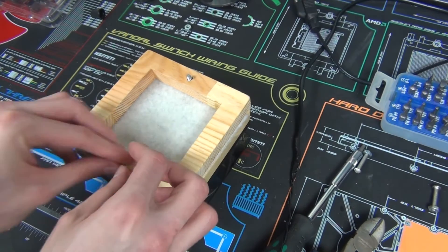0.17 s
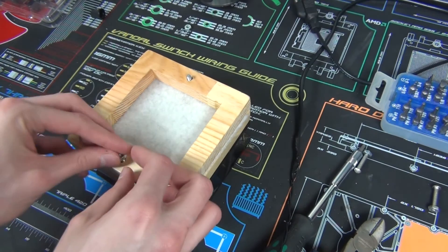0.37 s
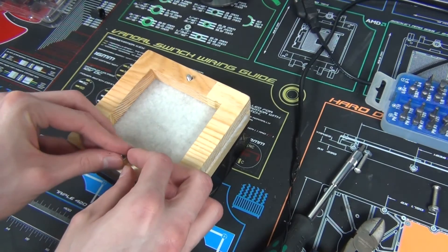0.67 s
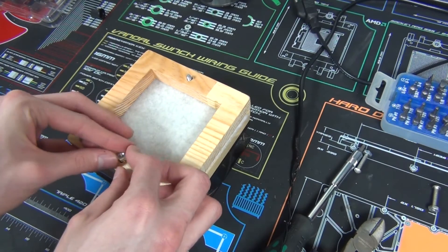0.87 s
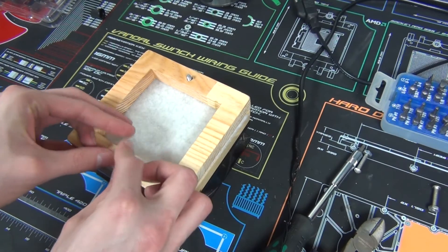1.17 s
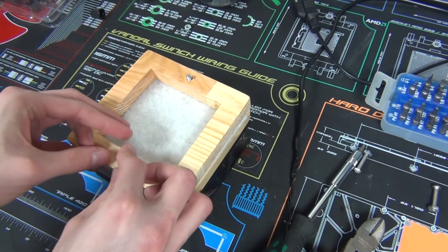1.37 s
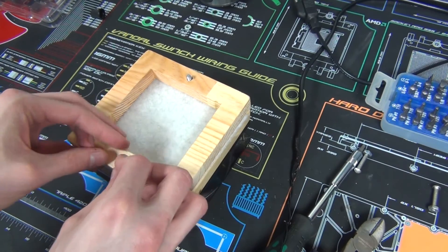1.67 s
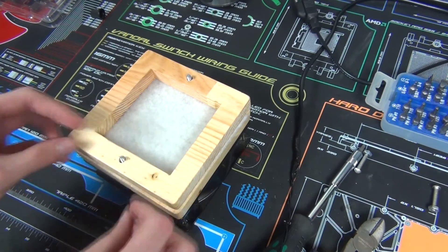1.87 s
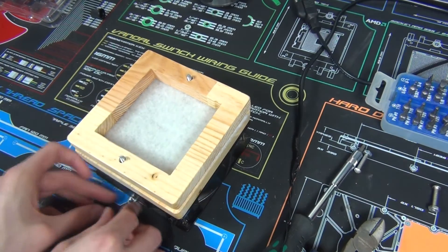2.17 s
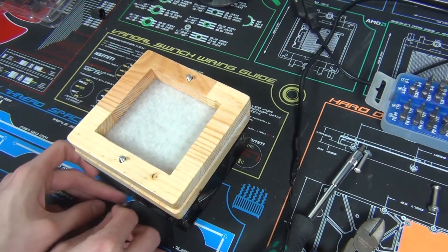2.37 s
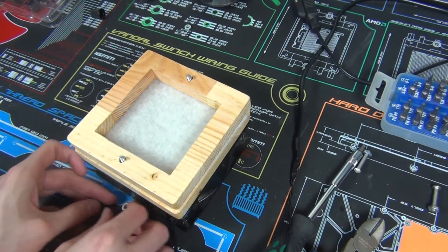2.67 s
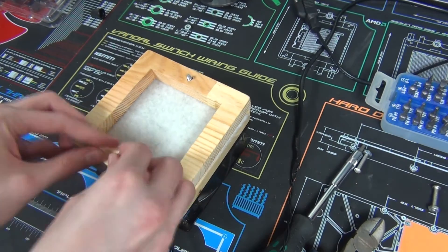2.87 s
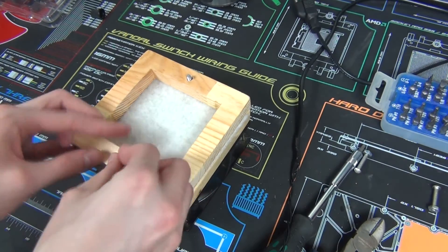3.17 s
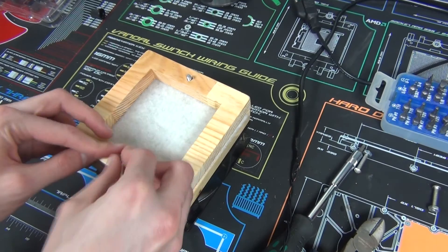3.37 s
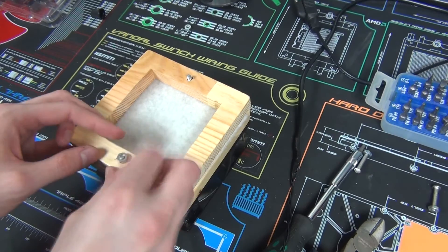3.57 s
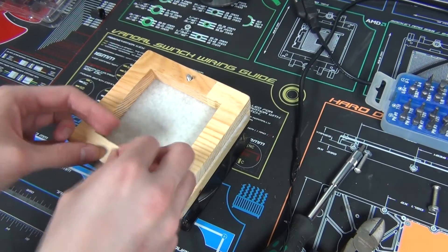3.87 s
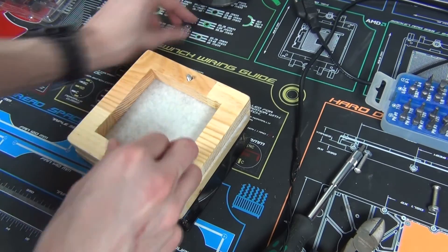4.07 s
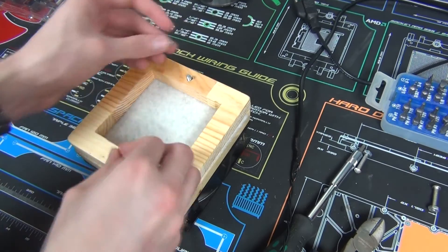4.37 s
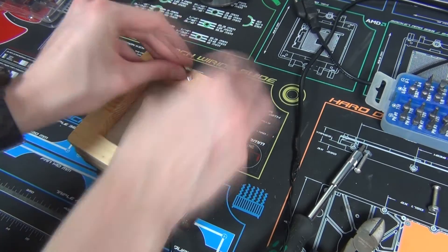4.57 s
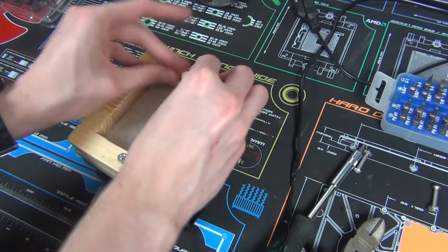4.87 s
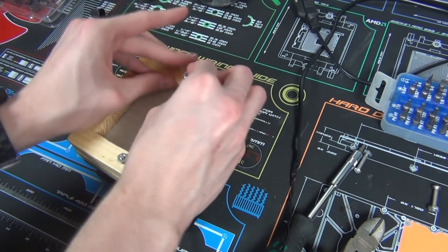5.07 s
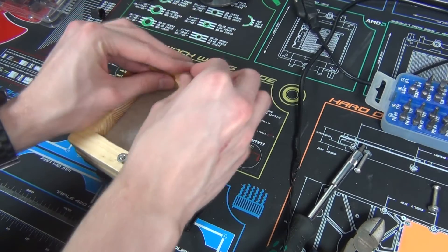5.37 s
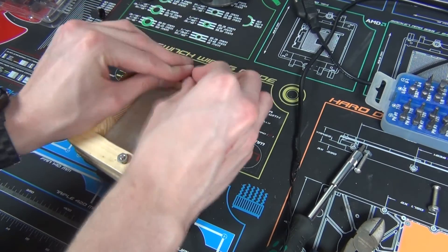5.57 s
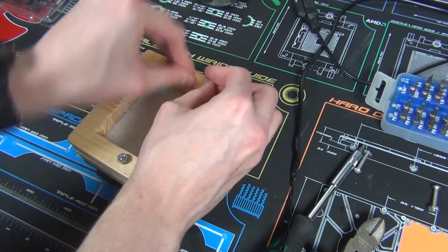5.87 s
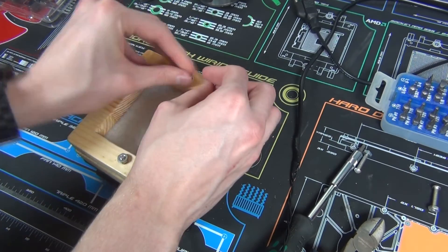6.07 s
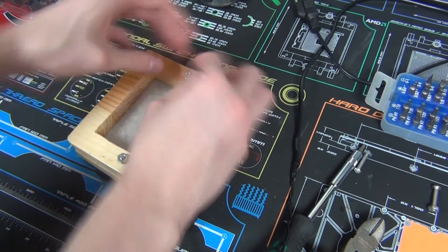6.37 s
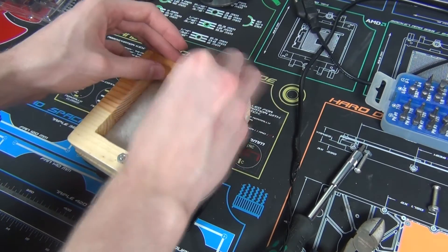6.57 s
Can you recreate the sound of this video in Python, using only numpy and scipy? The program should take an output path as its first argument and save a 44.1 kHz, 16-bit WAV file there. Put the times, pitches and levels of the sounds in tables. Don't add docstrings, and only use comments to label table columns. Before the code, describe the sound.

Close workbench fiddling: sharp metallic clicks, wooden knocks and a brief steel ring give way to faint ticks, scrapes and snaps above steady fan air.

```python
import sys
import numpy as np
from scipy import signal
from scipy.fft import rfft, irfft, next_fast_len
from scipy.io import wavfile
from scipy.ndimage import uniform_filter1d, map_coordinates

SR = 44100
rng = np.random.default_rng(int(sys.argv[2]) if len(sys.argv) > 2 else 0)


def wav_record(signal):
    frames = np.transpose(np.atleast_2d(signal))
    bounded = np.clip(frames, -1, 1)
    quanta = np.round(bounded * 32767).astype(np.int16)
    wavfile.write(sys.argv[1], SR, quanta)


def level_to_linear(level):
    exponent = np.asarray(level, float) / 20
    return 10 ** exponent


N = 297234
QUIET_FROM_S = 2.735

# f/Hz, width/Hz, level/dB
BOLT = [(1873, 78, 0), (2090, 200, 5), (2300, 360, 4), (2520, 630, -1.5)]


def unit(x):
    return x / np.sqrt(np.mean(x ** 2) + 1e-20)


def along(points, hz):
    f, v = np.transpose(points)
    return np.interp(np.log(hz + 1), np.log(f + 1), v)


def curve(rows):
    return np.interp(np.arange(N) / SR, *np.transpose(rows))


def wobble(rate):
    knots = rng.standard_normal(int(N * rate / SR) + 4)
    return map_coordinates(knots, [np.arange(N) * rate / SR])


def filtered(x, response):
    m = next_fast_len(N + SR // 2)
    return irfft(rfft(x, m) * response(np.fft.rfftfreq(m, 1 / SR)), m)[..., :N]


def body(peaks, widen=1.):
    def response(f):
        h = 0
        for k, (center, width, db) in enumerate(peaks):
            damping = 1j * f * width * widen
            h = h + (-1) ** k * level_to_linear(db) * damping / (center * center - f * f + damping)
        return h / np.sqrt(np.mean(np.abs(h) ** 2))
    return response


def ring(hz, t60, attack, flutter=0.):
    t = np.arange(SR // 2) / SR
    drift = flutter * np.cumsum(rng.standard_normal(len(t))) / np.sqrt(SR)
    return level_to_linear(-60 * t / t60) * (1 - np.exp(-t / attack)) * np.sin(2 * np.pi * hz * t + drift)


def strokes():
    # t/s, peak/dB, wood share/dB, nut share/dB, t60/s
    blows = [(0.2097, -11.5, -19.5, 0.5, 0.015), (0.23, -28.5, -4.5, -31.5, 0.04),
             (.387, -19.5, -10.5, -0.5, 0.034), (0.4989, -27.5, -11.5, -9, 0.044),
             (0.529, -17, -16, 2, 0.01), (0.6585, -19.5, -11, -5, 0.015), (0.7703, -23, -8.5, -8.5, 0.019),
             (1.4428, -14.5, -14.5, 1, 0.017), (1.494, -32.5, 1.5, -36.5, 0.038),
             (1.639, -21.5, 4, -33, 0.017), (1.6701, -11.5, -34, 4.5, 0.022),
             (1.8239, -26.5, -12, -0.5, 0.012), (2.1523, -36.5, -4.5, -2.5, 0.033),
             (2.3657, -33, -18, -9.5, 0.085), (2.5035, -45, 15, -31.5, 0.011),
             (2.8796, -29.5, -19.5, -0.5, 0.023), (3.086, -31, -11.5, -2.5, 0.028),
             (3.584, -35, -13, -5, 0.1), (4.7255, -33, -13.5, -6.5, 0.072), (5.4068, -39, -6, -5, 0.039),
             (5.415, -29.5, -21, -7, 0.029), (5.4868, -32, -16, -13.5, 0.0093),
             (5.986, -31, -6.5, 0, 0.034), (6.5605, -29.5, -17.5, -12.5, 0.012)]
    # t/s, peak/dB, wood share/dB, nut share/dB, rise/ms
    shoves = [(.0589, -32, -5.5, -11, 1.8), (.3479, -22.5, -5, -1, 3.1), (.3733, -13, -22, 1.5, 2.9),
              (.7491, -39.5, -2.5, -17, 10), (.8247, -42.5, 8, -28, 3.7), (.9779, -31.5, -6.5, -11, 2.7),
              (1.1708, -31, -22, -10.5, 3.3), (1.2178, -14.5, -11, 4.5, 2.5),
              (1.4735, -22, -10.5, 4.5, 7.3), (2.1417, -39.5, 3.5, -8, 2.2), (2.1601, -28.5, -6, -3.5, 2.1),
              (2.719, -41, -13, 6.5, 1.9), (2.888, -33.5, -13.5, -8, 4.1), (3.0967, -32.5, -11, -2, 5.6),
              (3.4045, -37, -11, -4.5, 2.1), (3.5988, -23, -13.5, -1, 13), (3.612, -25.5, -23, -1.5, 9.7),
              (4.7332, -31, -16, -3, 9.6), (4.875, -35, -14, -12, 5.3), (5.9989, -31, -11.5, 3.5, 4.1),
              (6.261, -41.5, -5, 6, 1.9), (6.2773, -44.5, -3, -13.5, 13.7), (6.705, -40, -3.5, -8.5, 47)]
    # t/s, peak/dB, wood share/dB, nut share/dB, t60/s
    rattles = [(0.238, -40, -3, 5, 0.021), (1.674, -26, -19, 2.5, 0.37), (1.712, -29.5, 3.5, -27.5, 0.038),
               (1.8906, -41, 1.5, -11, 0.13), (1.9447, -37, -2, 2, 0.1), (2.145, -42, 0, -2, 0.17),
               (2.2323, -56, -6, 6, .059), (2.4022, -60, 5, -7.5, 0.069), (3.0045, -45.5, -10, -36, 0.1),
               (4.181, -41, -5, -28, 0.038), (4.479, -43, -2.5, -19.5, 0.072),
               (5.8529, -44.5, -2, -24, 0.052), (5.8756, -44, -6, -7.5, 0.033),
               (6.6582, -45.5, -5, -21, 0.065)]
    # t/s, peak/dB, nut share/dB
    ticks = [(0.997, -44, -36), (2.023, -52, 9), (2.953, -44, -11.5), (3.172, -45, -8.5), (3.1885, -59, -1),
             (3.201, -46, -27.5), (3.3582, -51.5, -2), (3.544, -51, -19), (4.0024, -52.5, -16),
             (4.196, -44, -13), (4.6435, -53, -5.5), (4.9105, -52, -5), (5.1065, -46.5, -9.5),
             (5.1157, -40.5, -9), (5.1788, -39.5, -19), (5.195, -45.5, -17), (5.224, -37.5, -5.5),
             (5.3197, -45, -40), (5.3416, -41.5, -18), (5.356, -45, -13), (5.394, -53, -6),
             (5.4684, -42, -16), (5.994, -41, 8), (6.1218, -57.5, 3), (6.1954, -43, -6.5),
             (6.245, -43.5, -1), (6.5464, -40.5, -21), (6.6297, -49.5, -19.5), (6.6764, -45.5, -2.5)]
    # t/s, peak/dB, nut share/dB, rise/ms
    rolls = [(2.042, -58, 12, 2), (2.2965, -51, -3, 10), (2.32, -47.5, -3, 11), (3.285, -48, -33, 7.8),
             (3.4536, -49, -39, 3.6), (3.6762, -42, -5.5, 13), (3.856, -55, -7, 9.7),
             (3.9776, -56, -7, 9.1), (4.155, -46.5, -11, 17), (4.2177, -50, -21, 4.5),
             (4.655, -43, -6.5, 9.4), (4.7787, -45, -18, 4.1), (4.785, -44.5, -8, 9.6),
             (4.8236, -53, -15, 5.2), (4.9298, -54, 0, 8.6), (5.1307, -43.5, -9, 9.1),
             (5.2366, -46.5, -1.5, 4.9), (5.373, -48, -14, 5.8), (5.448, -51, -3, 4.2),
             (6.2727, -53.5, -12, 3.8), (6.3568, -46.5, -28, 28), (6.387, -51.5, -16.5, 6.2),
             (6.4337, -49.5, -24, 6.8)]
    # t/s, peak/dB, nut share/dB, rise/ms
    scrapes = [
        (1.211, -46, -14, 6),
        (2.866, -47, -8, 12),
        (4.709, -47, -8, 4),
        (4.886, -44, -10, 6),
    ]
    tick_wood_db, roll_wood_db = -11.5, -8
    return ([(s, db, wood, nut, 1.3, t60) for s, db, wood, nut, t60 in blows]
            + [(*row, 0.028) for row in shoves]
            + [(s, db, wood, nut, 4 + 1000 * .025 * t60, t60) for s, db, wood, nut, t60 in rattles]
            + [(s, db, tick_wood_db, nut, 3.1, 0.048) for s, db, nut in ticks]
            + [(s, db, roll_wood_db, nut, rise_ms, 0.033) for s, db, nut, rise_ms in rolls + scrapes])


def clump(rise_ms, t60):
    t = np.arange(SR // 4 if t60 > .12 else SR // 10) / SR
    rise = rise_ms / 1000 + 1e-4
    after = np.maximum(t - rise, 0)
    fall_db = -60 * after ** 2 / (after + 0.26 * rise) / (t60 + 0.0097)
    swell = level_to_linear(fall_db * [[.8], [.7], [.7], [1.1], [1.2]])
    swell = swell * np.minimum(t / rise, 1) ** 1.3
    snap = 1.1 / (1 + rise / 0.0035) * np.exp(-np.abs(t - rise) / 0.0004)
    grit = rng.standard_normal((3, len(t)))
    clumps = unit(uniform_filter1d(grit[2], size=24))
    grit = unit(grit[0] * level_to_linear(2.1 * grit[1] + 3.0 * clumps))
    return swell * grit + snap * np.sign(grit)


def contacts():
    # f/Hz, width/Hz, level/dB
    wood = [(300, 50, -13.5), (622, 72, -2.5), (878, 120, 6), (1012, 95, 11), (1217, 279, 8.5),
            (1500, 490, 4)]
    # f/Hz, width/Hz, level/dB
    held_bolt = [(1543, 210, -2.5), (1830, 190, 1), (2200, 275, 6.5), (2410, 690, 1.5)]
    # f/Hz, width/Hz, level/dB
    thread = [(3040, 500, -2), (3452, 460, 3), (4530, 640, 2), (5250, 1200, 2.5), (5950, 860, 0.5)]
    # f/Hz, width/Hz, level/dB
    steel_nut = [(6550, 18, -5), (7410, 67, 0), (8720, 140, -2.5), (9560, 87, -1.5), (10550, 190, -8),
                 (13130, 1000, -14.5)]
    # t/s, peak/dB, bolt share/dB, nut share/dB
    snaps = [(.212, -17, -0.5, -7), (.241, -26, -1, 1.5), (.3885, -16, 1, 4), (1.2203, -20, -4, 12),
             (1.6405, -24, -1, -10), (1.672, -26, -8, -9), (2.024, -39.5, -15, 6), (2.043, -45, -15, 4),
             (2.145, -40, -2, 0), (2.152, -36, -6, 1), (2.306, -50, -8, -5), (2.335, -46, -3, -3),
             (2.376, -35, -10, -5), (2.385, -48, -12, -8), (2.468, -55, -20, 2.5), (3.020, -50, -4, -10),
             (3.300, -56, -3, -8), (3.360, -51, -5, -1), (4.651, -44, -6, -2), (4.667, -44, -6, 3),
             (4.712, -50, -4, -8), (4.727, -37, -5, 0), (4.756, -43, -10, -2), (4.782, -46, -4, -5),
             (4.795, -46, -8, -1), (4.829, -47, -10, -10), (4.868, -43, -8, -9), (4.885, -34, -8, -6),
             (4.896, -36, -8, -9), (4.914, -49, -2, -10), (4.994, -53, -6, -3), (5.119, -37, -11, -3),
             (5.139, -40, -5, -7), (5.195, -45, -3, -3), (5.245, -35, -9, -6), (5.343, -43, -10, -7.5),
             (5.358, -42, -10, -7), (5.395, -45, -8, -5), (5.4175, -31, -6, -3), (5.425, -39, -8, 2),
             (5.453, -46, -8, -5), (5.472, -42, -4, -8.5), (5.9955, -34, -4, -5), (6.004, -36, -9, -0.5)]
    held_from_s = 2.25
    held_bolt_db, held_thread_db = -1.5, 1.5
    skip_samples, skip_sizes = np.array([-31, -9, 0, 23, 58]), [.3, -.5, 1, -.6, .4]
    snap_db = 8.5

    force = np.zeros((5, N + SR))
    for s, db, wood_db, nut_db, rise_ms, t60 in strokes():
        held = s > held_from_s
        thread_db = 0.4 * nut_db - 6.0 + held_thread_db * held
        shares = level_to_linear([wood_db - 0.5, -8, held_bolt_db - 8, thread_db, nut_db - 5.5])
        shares = shares * [True, not held, held, True, True]
        impacts = clump(rise_ms, t60)
        force[:, round(s * SR):][:, :impacts.shape[1]] += level_to_linear(db) * shares[:, None] * impacts
    for s, db, bolt_db, nut_db in snaps:
        held = s > held_from_s
        shares = level_to_linear([bolt_db - 8.5, bolt_db, bolt_db, -3, nut_db]) * [True, not held, held, True, True]
        force[:, round(s * SR) + skip_samples] += level_to_linear(db + snap_db) * np.outer(shares, skip_sizes)

    def reach(hz, low_hz, high_hz):
        above = (1j * hz / (low_hz + 1j * hz)) ** 2
        below = 1 / (1 - (hz / high_hz) ** 2 + 1.4j * hz / high_hz)
        return above * below

    # modes, widening, lowest and highest f/Hz
    parts = [(wood, 2.1, 200, 2400), (BOLT, .8, 700, 3500), (held_bolt, .9, 700, 3500),
             (thread, 1.3, 1500, 7000), (steel_nut, 7.5, 3000, 19000)]
    out = np.zeros(N)
    for push, (modes, widen, low_hz, high_hz) in zip(force[:, :N], parts):
        out += filtered(push, lambda hz: body(modes, widen)(hz) * reach(hz, low_hz, high_hz))
    return out


def steel():
    # t/s, peak/dB
    clinks = [
        (1.8925, -27),
        (1.945, -32.5),
    ]
    # f/Hz, t60/s, first level/dB, second level/dB
    loose = [(2225, 0.122, -2, -5), (2530, 0.14, -6.5, -11.5), (3400, .8, -27, -17.5),
             (3873, 0.22, -11, -16), (4420, 0.094, -13.5, -0.5), (4775, .08, -6, -17),
             (6410, .06, -13, -15), (7210, 0.16, -13, -17.5), (7763, .04, -10.5, -14),
             (8800, .07, -11.5, -6), (9281, 0.216, -27, -25), (9868, .1, -26, -17.5),
             (11740, .12, -21.5, -11.5), (12650, .05, -15, -22)]
    # f/Hz, level/dB, t60/s
    dropped = [(2092, -3, .3), (2165, -0.5, .3), (2890, -10, .3), (3530, -5.5, .3), (3840, -12, 0.15),
               (6000, -12, .25), (6800, -6, .22), (6900, 0, 0.25), (8470, -6.5, .2), (8300, -4.5, .25),
               (9281, -4.5, .22), (9921, -6.5, .22), (12320, -10, 0.17), (12980, -11.5, .18)]
    # t/s, level/dB
    drop = (1.671, -29.5)
    # f/Hz, level/dB, t60/s
    washer = [(5790, 1, 0.1135), (6000, -1.5, 0.12), (7461, -15.5, 0.12), (7540, -5, .15),
              (9500, -20, 0.29)]
    # t/s, level/dB
    washer_hit = (1.48, -34)
    # f/Hz, level/dB, t60/s
    frame = [(566, -11, .03), (823, -7, 0.055), (1043, -3.5, .04), (1206, -7, 0.048), (1464, -4, 0.041),
             (1850, 1, 0.043), (2070, -1, 0.016), (2462, -4, 0.026), (2865, -6, 0.0177), (3500, -7, .015)]
    # t/s, level/dB
    knocks = [
        (1.640, -11),
        (5.325, -45),
        (6.5632, -40),
    ]
    # t/s, level/dB, f/Hz, t60/s
    pings = [(.060, -35, 4570, 0.022), (.376, -12, 5200, 0.021), (1.733, -39, 2060, 0.036),
             (1.760, -44, 2240, 0.11), (2.164, -42, 9500, .05), (2.368, -51, 4000, .03),
             (2.384, -48, 4800, .03), (4.183, -48, 2300, .04), (4.727, -44, 4440, .025),
             (4.743, -37, 4550, .03), (4.781, -50, 4500, .02), (4.829, -49, 4500, .02),
             (4.867, -50, 4400, .02), (4.879, -40, 4460, 0.034), (4.895, -44, 4500, .02),
             (4.913, -51, 3500, .06), (4.913, -50, 1500, .03), (4.931, -53, 3320, .03),
             (5.243, -41, 4500, .02), (5.320, -44, 1780, .03), (5.419, -41, 2200, .04),
             (5.990, -39, 1850, 0.078), (6.250, -44, 1850, 0.059), (6.290, -48.5, 2200, .04),
             (6.562, -43, 1850, .035)]

    hits = []  # t/s, level/dB, modes, how much the pitch shakes
    for k, (s, db) in enumerate(clinks):
        hits.append((s, db, [(hz, levels[k], t60) for hz, t60, *levels in loose], 1.5))
    hits += [(*drop, dropped, 4.), (*washer_hit, washer, 1.2)]
    hits += [(s, db, frame, 1.2) for s, db in knocks]
    out = np.zeros(N + SR)
    for s, db, modes, shake in hits:
        for hz, level, t60 in modes:
            tone = ring(hz, t60, 0.00025, flutter=shake / np.sqrt(t60) * 3)
            out[round(s * SR):][:SR // 2] += level_to_linear(db + level + rng.normal(0, 1.9)) * tone
    for s, db, hz, t60 in pings:
        out[round(s * SR):][:SR // 2] += level_to_linear(db) * ring(hz, t60, 0.0006, flutter=18.0)
    return filtered(out[:N], lambda hz: (1j * hz / (150 + 1j * hz)) ** 2)


def thuds():
    # t/s, peak/dB, f/Hz
    pushes = [(0.057, -45.5, 101), (0.06, -38, 282), (0.063, -37, 460), (0.209, -44.5, 79),
              (0.371, -44, 95.4), (0.736, -49, 111), (0.83, -61.5, 91), (1.211, -61, 120), (1.481, -59, 59),
              (1.638, -26.5, 300), (1.64, -50, 120), (1.716, -36.5, 300), (1.804, -51.5, 81.6),
              (2.144, -43.5, 79.5), (2.15, -37.5, 183), (2.159, -38.5, 360), (2.869, -61, 60),
              (3.077, -53.5, 110.5), (3.672, -52, 65.3), (3.852, -62, 60.5), (3.999, -62, 55.3),
              (4.175, -58, 70.3), (4.476, -56, 74.3), (4.718, -59, 88.6), (.39, -56, 70), (2.136, -45, 200),
              (2.168, -42, 130), (2.185, -50, 240), (4.49, -58, 130), (3.4, -69, 60), (4.38, -62, 55.3),
              (5.3, -64.5, 55.3), (6.19, -62, 70), (6.55, -64, 60.2), (6.71, -63, 59.5)]
    out = np.zeros(N + SR)
    for s, db, hz in pushes:
        out[round(s * SR):][:SR // 2] += level_to_linear(db + 15.5) * ring(hz, 7.2 / hz, 1.4 / hz, flutter=3.0)
    return out[:N]


def rub():
    # t/s, length/s, level/dB
    drags = [
        (1.05, 0.67, -65),
        (1.7, 0.96, -65),
        (3.04, 0.23, -70.5),
        (3.53, 0.016, -62.5),
        (3.956, 0.047, -72.5),
        (4.642, 0.302, -62.5),
        (5.257, 0.25, -76.5),
        (5.99, 0.69, -83),
    ]
    # f/Hz, level/dB per Hz
    skin = [(410, -30), (700, -8.5), (886, -12), (1480, -6.5), (2160, -15.5), (2990, -14), (6740, -24),
            (16000, -42)]
    rest_db, ease_s = -80, 0.02
    t = np.arange(N) / SR
    pressure = level_to_linear(rest_db)
    for s, length, db in drags:
        inside = np.minimum(t - s, s + length - t)
        pressure = pressure + level_to_linear(db) * np.clip(inside / ease_s + 1, 0, 1)
    grains = rng.standard_normal(N) * level_to_linear(np.minimum(4.7 * wobble(60) + 3.4 * wobble(300), 9))
    drag = filtered(grains, lambda hz: level_to_linear(along(skin, hz)) * (1 + .3 * body(BOLT)(hz)))
    return pressure * level_to_linear(3.5) * unit(drag)


def diffuse(x):
    z = signal.stft(x, nperseg=256)[2]
    even = np.sqrt(np.abs(uniform_filter1d(np.abs(z) ** 2, size=7, axis=0)))
    return signal.istft(even * np.exp(1j * np.angle(z)), nperseg=256)[1][:N]


def room(x, size, count):
    # f/Hz, t60/s
    decay = [(300, 0.77), (2000, 0.42), (7000, 0.3), (14000, 0.14)]
    out = np.zeros((2, N + SR))
    step = -(-N // count)
    moments = np.pad(x, (0, count))[:step * count].reshape(count, -1)
    for start, part in zip(range(0, N, step), moments):
        hz, t, z = signal.stft(rng.standard_normal((2, SR // 2)), SR, nperseg=256)
        fall = level_to_linear(-60 * t / (size * along(decay, hz)[:, None]))
        mid, side = signal.istft(z * fall, SR, nperseg=256)[1]
        tail = np.array([mid + .5 * side, mid - .5 * side]) / np.linalg.norm(mid)
        delayed = np.pad(part, (260, 0))[None]
        answer = signal.fftconvolve(delayed, tail, axes=1)
        out[:, start:start + answer.shape[1]] += answer
    return out[:, :N]


def rush(gain, alike):
    turn = lambda hz: np.arccos(np.clip(along(alike, hz), -1, 1)) / 2
    noise = rng.standard_normal((2, N))
    mid, side = filtered(noise, lambda hz: gain(hz) * [np.cos(turn(hz)), np.sin(turn(hz))])
    return unit(np.array([mid + side, mid - side]))


def fan():
    # f/Hz, level/dB per Hz
    breeze = [(15, -50), (25, -14), (105, -5.5), (288, -2.5), (433, -2.5), (634, -5.5), (952, -5.5),
              (1360, -4.5), (1470, -7.5), (8600, -23.5), (11600, -23), (15200, -27), (16500, -56)]
    # f/Hz, width/Hz, level/dB
    hums = [(120, 27, 10), (177, 12, 9), (279.4, 13, 5.5), (634.2, 35, 13), (870, 43, 5), (1327, 12, 11.5)]
    # f/Hz, likeness/1
    likeness = [(60, 1), (130, 0.97), (300, 0.88), (900, 0.64), (3500, 0.25), (15000, 0.5)]
    # f/Hz, left minus right/dB
    lean = [(300, 0), (800, 7), (1500, 4), (4000, 0.5)]
    # t/s, level/dB
    whine = [
        (5.25, -100),
        (5.4, -77),
        (5.7, -77),
        (6.0, -79.5),
        (6.1, -87.5),
        (6.45, -82),
        (6.5, -100),
    ]
    duct = lambda hz: 1 + sum(level_to_linear(db) / (1 + (2 * (hz - c) / w) ** 2) for c, w, db in hums)
    level_db = -53 - 6 * (np.arange(N) > QUIET_FROM_S * SR) + 0.26 * wobble(2.3)
    air = level_to_linear(level_db) * rush(lambda hz: level_to_linear(along(breeze, hz)) * duct(hz), likeness)
    air = filtered(air, lambda hz: level_to_linear(along(lean, hz) * [[.5], [-.5]]))
    fizz = rush(lambda hz: 1 / (1 + ((hz - 11600) / 400) ** 2), [(1000, .7)])
    return air + level_to_linear(curve(whine) + 1.5 * wobble(30)) * fizz


def scene():
    # t/s, level/dB
    mat = [
        (.00034, -23),
        (.00052, -21),
    ]
    spread_samples = .42
    clicks, rings = contacts(), steel() + thuds()
    near, around = clicks + rings, diffuse(clicks) + rings
    opened = np.arange(N) < QUIET_FROM_S * SR
    tails = level_to_linear(-13.5) * room(around, size=1, count=30) * opened
    tails = tails + level_to_linear(-16) * room(around * ~opened, size=.4, count=9)
    echoed = filtered(near, lambda hz: [1 + level_to_linear(db) * np.exp(-2j * np.pi * hz * s) for s, db in mat])
    echoed = echoed + spread_samples * wobble(15) * np.gradient(echoed, axis=1) * [[1], [-1]]
    return echoed + rub() + tails + fan()


def band_limit(x):
    return signal.sosfilt(signal.butter(12, 16850, fs=SR, output="sos"), x)


def record(dry):
    # f/Hz, left minus right/dB
    port = [(60, -22), (110, -13.5), (200, -13), (380, -11), (700, -6.5), (1290, -2), (2380, 0), (4400, -2),
            (8120, -1.5), (15000, -16)]
    # f/Hz, left leads by/rad
    lead = [(100, -0.2), (600, -0.049), (4200, -1.3), (5050, -0.86), (6630, -0.19), (8700, -0.25),
            (11000, -1.5), (12000, -0.15), (15000, -.5)]
    top_hz = 16100
    tilt = lambda hz: level_to_linear(along(port, hz)) * np.exp(1j * along(lead, hz))
    pair = lambda hz: [2 * tilt(hz), 2 + 0 * hz] / np.abs(1 + tilt(hz))
    ports = filtered(dry, lambda hz: pair(hz) / (1 + (hz / top_hz) ** 40))
    ports = ports / (1 + np.abs(ports / .92) ** 6) ** (1 / 6)
    return band_limit(ports)


dry = scene()
out = record(dry)
wav_record(out)
```